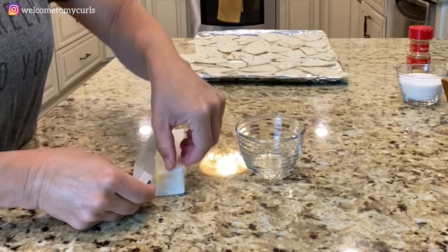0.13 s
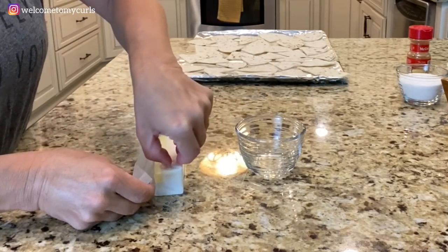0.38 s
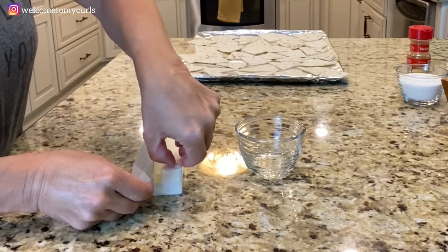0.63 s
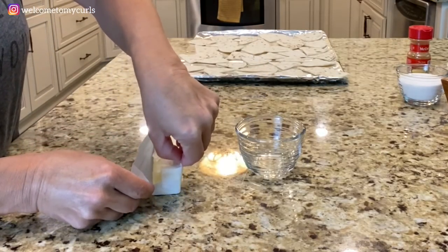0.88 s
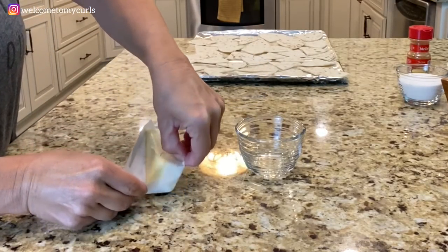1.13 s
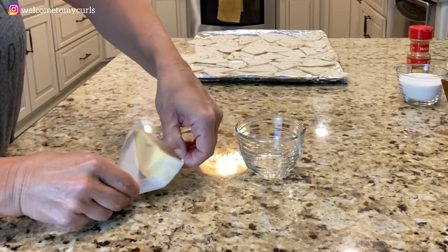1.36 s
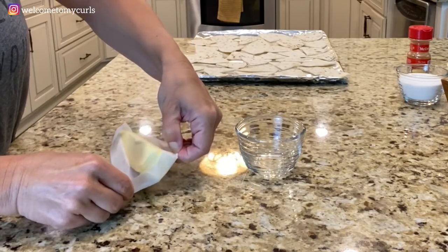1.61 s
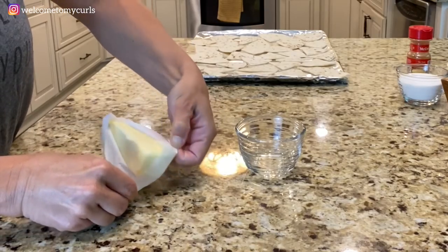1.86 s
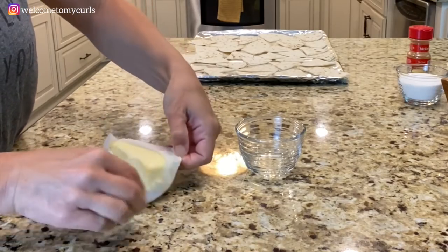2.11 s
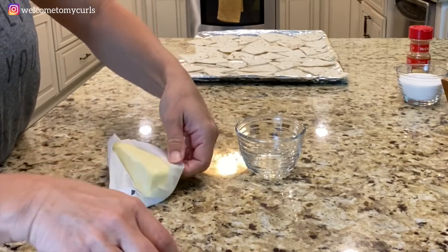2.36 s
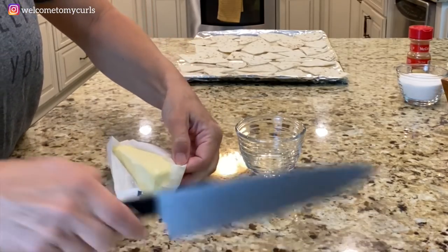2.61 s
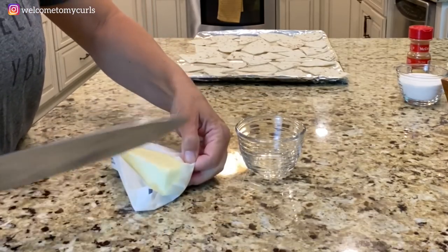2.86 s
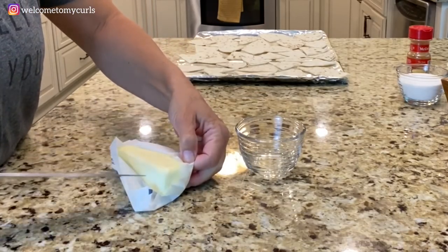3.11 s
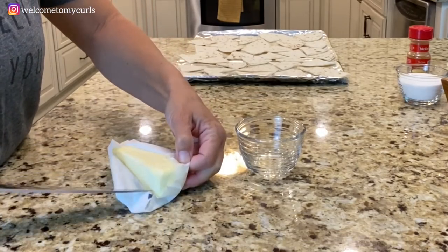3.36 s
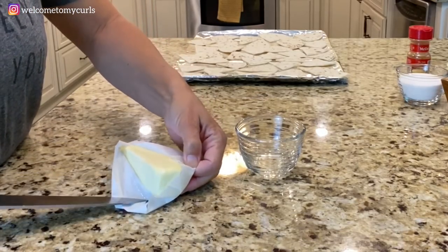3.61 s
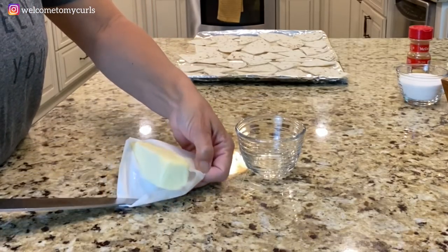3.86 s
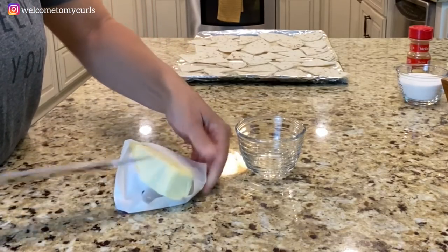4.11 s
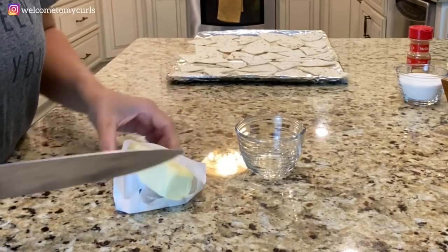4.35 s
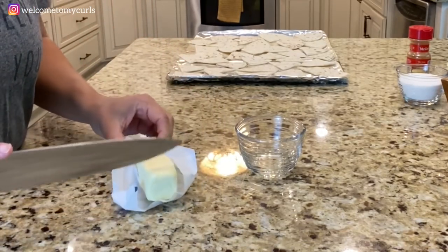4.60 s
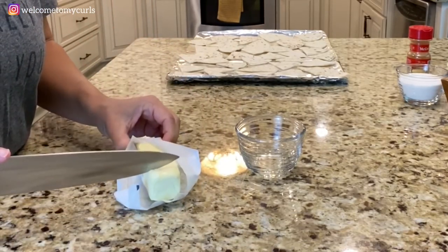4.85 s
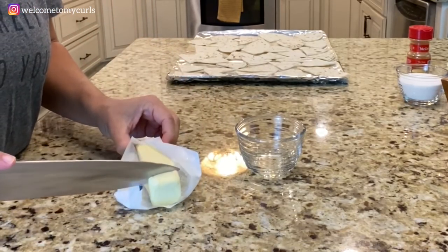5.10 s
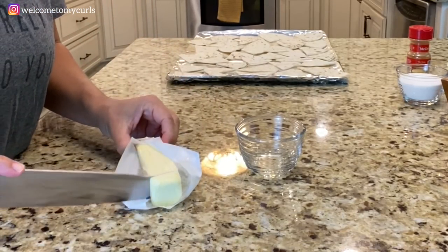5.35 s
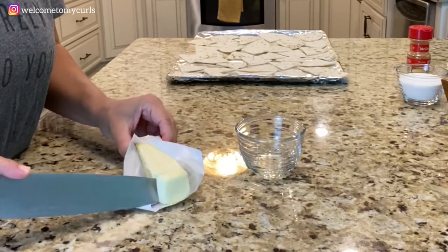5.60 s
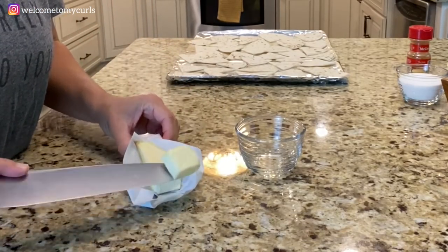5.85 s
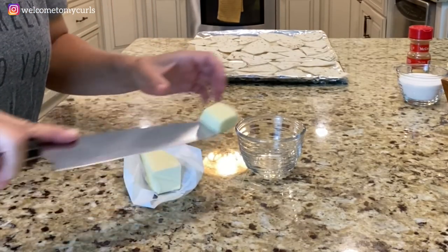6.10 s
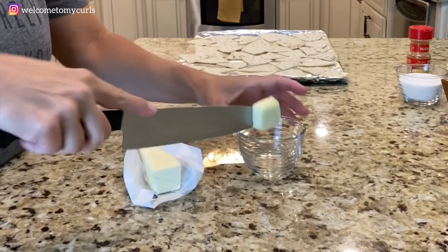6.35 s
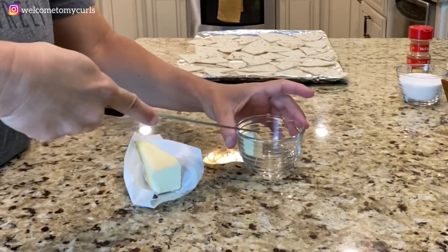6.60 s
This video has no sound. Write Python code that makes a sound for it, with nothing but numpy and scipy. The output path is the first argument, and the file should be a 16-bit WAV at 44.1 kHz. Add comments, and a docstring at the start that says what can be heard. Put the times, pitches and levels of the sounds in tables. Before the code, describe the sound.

A phone an arm's length away picks up a hard, reflective kitchen with faint air noise and low appliance hum. From 0 to 0.7 s waxed paper ticks quietly and fingertips hiss over it. Sharp, bright creases snap around 0.85 and 1.0 s, fewer follow, then a strong snap at 1.75 s. From 2.0 to 2.65 s comes a denser rustle with soft pats, low dull thumps and a tiny squeak near 2.5 s. A lull lasts until about 3.3 s, then crisp crinkling runs in bursts to 4.2 s. Lighter crackles and a thin scrape follow around 4.5 s, more snaps at 5.1 s. At 5.44 s the knife knocks the stone with a hard clack; paper rustles until 5.8 s. Near quiet, with tiny bouncing ticks at 6.4 s, then at 6.46 s a glass bowl clinks brightly and rattles on its foot, fading by about 6.6 s.

```python
"""Stone kitchen counter, an arm's length from a phone: waxed paper is peeled off a block of butter.
Creases snap as jolts through band-pass resonances; rubbing is ticks and hiss under swelling gains.
A knife drops through the butter onto the counter, then taps a small glass bowl that rings and rocks (decaying modes).
Pats, thumps, a squeak, a bouncing crumb and a scrape join in. The hard-walled kitchen answers by convolution
with an echo and decaying noise; appliance hum and air noise lie under it all."""
import sys
import numpy as np
from scipy import signal
from scipy.fft import rfft, irfft
from scipy.io import wavfile
from scipy.ndimage import uniform_filter1d

SR = 44100
rng = np.random.default_rng(int(sys.argv[2]) if len(sys.argv) > 2 else 0)


def put_to_file(sound):
    """Save the sound as 16-bit audio at rate SR, in the file named by the first command-line argument."""
    columns = np.atleast_2d(sound).T  # one column per channel
    safe = np.clip(columns, -1, 1)
    whole_steps = np.round(safe * 32767)
    wavfile.write(sys.argv[1], SR, whole_steps.astype(np.int16))


def invert_db(x):
    """Field ratio 10**(x/20) for x, a level in decibels (scalar or array-like)."""
    u = np.asarray(x, float) / 20
    return 10 ** u


N = 296372
T = np.arange(N) / SR


def colour(x, points):
    """Filter by a gain curve of (Hz, dB) points, interpolated over log frequency."""
    hz, db = np.transpose(points)
    f = np.fft.rfftfreq(x.shape[-1], 1 / SR) + 1
    gain_db = np.interp(np.log(f), np.log(hz), db)
    return irfft(rfft(x) * invert_db(gain_db), x.shape[-1])


def band(x, lo_hz, hi_hz):
    """Causal band-pass."""
    sos = signal.butter(2, [lo_hz, min(hi_hz, SR / 2.2)], "bandpass", fs=SR, output="sos")
    return signal.sosfilt(sos, x)


def band_rms(x, lo_hz, hi_hz):
    """Scale so that the band has rms 1."""
    return x / np.std(band(x, lo_hz, hi_hz))


def peak(x, db):
    """Scale to a peak level."""
    return x * invert_db(db) / np.max(np.abs(x))


def walk(rate_hz):
    """Slow random wander with spread 1."""
    k = int(SR / rate_hz)
    steps = np.repeat(rng.standard_normal(N // k + 1), k)
    w = uniform_filter1d(uniform_filter1d(steps, k), k)[:N]
    return w / np.std(w)


def bump(centre_s, length_s):
    """Bell-shaped gain; the length is two standard deviations."""
    return np.exp(-.5 * ((T - centre_s) / (length_s / 2)) ** 2)


def add(out, s, x):
    """Mix x into out at s seconds."""
    i = int(s * SR)
    out[i:i + len(x)] += x[:len(out) - i]


def jolts(count, settle_s=0.00594):
    """Sharp jolts, each an impulse with a flurry of uneven noise as the sheet settles."""
    t = T[:2500]
    noise, grain = rng.standard_normal((count, 2, 2500)).transpose(1, 0, 2)
    jolt = (t == 0) + .22 * noise * np.exp(-t / .0006)
    flurry = invert_db(-30 + 2.99 * grain) * noise * np.exp(-t / settle_s)
    return jolt + flurry


def thud(jolt, db, hz, span=1.422):
    """The dull, low part of a jolt, band-passed twice around hz."""
    low = band(jolt, hz / span, hz * span)
    return peak(band(low, hz / span ** 2, hz * span ** 2), db)


def snaps(panel_q=2.805, broad=0.436):
    """Creases flip over: each jolt rings panel and fold, thuds and spits at the edge."""
    # Each row: start in seconds, panel peak in dB, panel pitch in Hz, fold peak in dB, edge peak in dB.
    flips = [(0.0918, -48.5, 2260, -51, -67), (0.3023, -54.5, 3270, -55.5, -61.5),
             (.3821, -36, 3270, -47, -41), (0.4783, -49, 2590, -54.5, -47),
             (0.51, -48.5, 2530, -47.5, -55.5), (.5212, -48.5, 4250, -56, -37.5),
             (0.6678, -38.5, 3720, -48, -38), (.7315, -43.5, 6070, -61.5, -45),
             (0.8132, -36, 3110, -55, -30), (.842, -21.5, 3864, -30.5, -13),
             (0.9733, -23.5, 3670, -29, -23), (0.9828, -20.5, 5950, -36, -16),
             (0.9905, -15, 5926, -49.5, -10.5), (0.9952, -27, 3680, -35, -31),
             (1.1244, -28, 2950, -53, -20.5), (1.2375, -56.5, 2250, -48.5, -65),
             (1.3421, -43.5, 3910, -45.5, -49), (1.4376, -30, 4730, -49, -35.5),
             (1.534, -42.5, 2210, -51.5, -68), (1.654, -49.5, 3530, -48.5, -41),
             (1.6965, -33, 5270, -64.5, -33), (1.7056, -40, 6460, -64, -39),
             (1.7518, -14.5, 5460, -44.5, -13.5), (1.7638, -25.5, 6000, -53, -26),
             (1.767, -42, 5730, -33.5, -21.5), (1.785, -20, 4796, -56.5, -34.5),
             (1.9691, -35, 3820, -42.5, -42.5), (2.0141, -29.5, 4740, -44.5, -29),
             (2.044, -44.5, 3360, -46.5, -48.5), (2.091, -33, 5980, -52.5, -24),
             (2.1331, -26.5, 2690, -39, -28.5), (2.1491, -27.5, 5040, -46.5, -41),
             (2.1733, -17, 3440, -30.5, -16), (2.1888, -30, 3230, -51, -42.5),
             (2.245, -35.5, 4050, -50.5, -55.5), (2.2967, -50.5, 3140, -40.5, -45),
             (2.3044, -47, 2240, -44, -44.5), (2.3108, -40, 4610, -49.5, -26),
             (2.4233, -41.5, 2250, -43, -62.5), (2.4906, -31.5, 3950, -43.5, -19),
             (2.516, -46, 2230, -61.5, -41.5), (2.5276, -42, 2870, -64, -37),
             (2.6525, -30.5, 3350, -42.5, -23.5), (3.268, -39, 2227, -44, -61),
             (3.358, -23, 2780, -35, -18.5), (3.3934, -36, 3620, -36.5, -43),
             (3.4649, -38.5, 3530, -35.5, -37), (3.4766, -16, 4130, -22.5, -15),
             (3.4992, -23, 2930, -29, -35), (3.5197, -25, 3450, -30.5, -23.5),
             (3.573, -37, 2250, -52.5, -53.5), (3.6465, -23.5, 3370, -32, -56.5),
             (3.667, -30, 2800, -47.5, -35), (3.681, -53, 6300, -47, -18),
             (3.6868, -14.5, 4156, -27.5, -38.5), (3.715, -22, 4330, -36, -51.5),
             (3.8236, -36, 2190, -28, -61.5), (3.8578, -39.5, 2700, -38, -47.5),
             (3.8641, -32, 3840, -46.5, -29.5), (3.8853, -27.5, 5375, -45, -23.5),
             (3.8936, -20, 4320, -31, -15), (3.9118, -22.5, 4280, -30.5, -23.5),
             (3.9878, -20.5, 6030, -40.5, -17), (4.0141, -29.5, 3770, -28.5, -25.5),
             (4.0285, -24, 4450, -26.5, -18), (4.0505, -23, 3350, -46, -30),
             (4.0592, -32.5, 2270, -49.5, -25), (4.0873, -32, 2234, -37, -49),
             (4.106, -39.5, 3464, -50.5, -33), (4.431, -48.5, 3450, -69, -62),
             (4.5198, -28, 3090, -25, -54.5), (4.525, -21, 3310, -39, -32.5),
             (4.5278, -37, 2210, -30.5, -42.5), (4.5303, -25.5, 2630, -39, -22),
             (4.5614, -33, 5700, -51.5, -35.5), (4.7743, -50, 2580, -65, -61.5),
             (5.0588, -25, 4550, -46, -36.5), (5.0647, -34.5, 4900, -48, -29),
             (5.072, -25, 2068, -38.5, -24), (5.0841, -26, 3260, -42.5, -53.5),
             (5.164, -35, 4460, -51, -52), (5.2412, -31.5, 5760, -61.5, -28.5),
             (5.3772, -33.5, 3590, -42, -34), (5.4168, -36, 2540, -55.5, -52),
             (5.427, -19, 6230, -38.5, -19.5), (5.5126, -33, 2560, -46.5, -34),
             (5.541, -36.5, 2400, -46, -60), (5.888, -65.5, 6400, -72, -48),
             (5.909, -65.5, 6400, -71.5, -48.5), (5.7512, -25.5, 4780, -34, -48),
             (5.7679, -32, 2940, -41, -32.5), (6.309, -71, 4670, -71.5, -46)]
    thud_hz, thud_over_fold_db = 708.5, -14
    out = np.zeros(N)
    for (s, panel_db, hz, fold_db, edge_db), jolt in zip(flips, jolts(count=len(flips))):
        half_hz = hz / panel_q / 2
        pitched = peak(band(jolt, hz - half_hz, hz + half_hz), 0)
        panel = pitched + broad * peak(band(jolt, 2790, 4910), 0)
        fold = band(band(jolt, 1366, 1960), 850, 2770)
        edge = band(band(jolt, 6800, 15000), 5500, 16000)
        add(out, s, peak(panel, panel_db) + peak(fold, fold_db) + peak(edge, edge_db))
        add(out, s, thud(jolt, fold_db + thud_over_fold_db, thud_hz))
    return out


def pats():
    """The wrapped block pats the counter or the fingers: the dull part of a jolt alone."""
    # Each row: start in seconds, peak in dB, pitch in Hz.
    soft_hits = [(0.091, -48.5, 652), (0.301, -44.5, 1194), (0.38, -49, 751), (0.665, -44.5, 1190),
                 (0.84, -32, 826), (0.989, -38, 802), (1.122, -33, 761), (1.226, -40.5, 1090),
                 (1.341, -50.5, 541), (1.436, -43.5, 779), (1.749, -40, 1160), (2.014, -38, 735),
                 (2.043, -41, 778), (2.133, -34, 1095), (2.171, -34, 822), (2.244, -38.5, 1034),
                 (2.303, -41.5, 900), (2.515, -49.5, 961), (2.651, -35, 1095), (3.268, -48.5, 397),
                 (3.357, -42.5, 875), (3.465, -35, 1002), (3.518, -38, 419), (3.987, -39, 703),
                 (3.997, -37, 767), (4.012, -32.5, 773), (4.027, -26.5, 474), (4.105, -41.5, 662),
                 (4.157, -44, 604), (4.176, -44, 999), (5.092, -49.5, 514), (5.164, -47.5, 509),
                 (5.238, -44.5, 593), (5.511, -29, 717), (5.672, -47.5, 575)]
    out = np.zeros(N)
    for (s, db, hz), jolt in zip(soft_hits, jolts(count=len(soft_hits))):
        add(out, s, thud(jolt, db, hz))
    return out


def swells(peak_s, db, rise_s, fade_s):
    """Gain of gestures that build to a peak and fade, both evenly in dB; their powers add."""
    power = 0
    for p, d, fade in zip(peak_s, db, fade_s):
        steps = np.maximum((p - T) / rise_s, (T - p) / max(fade, .01))
        power = power + invert_db(d - 20 * steps) ** 2
    return np.sqrt(power)


def rubbing(hiss=0.595):
    """Paper crackles as a swarm of tiny unequal ticks; skin on wax hisses high and smooth."""
    # Tugs at the sheet. Each row: peak time in seconds, flexing level in dB, crackle level in dB,
    # fade in seconds per 20 dB (under 0.01 acts as 0.01).
    tugs = [(.006, -73, -69, 0.4557), (.513, -73, -70, 0.1247), (.7, -65, -61, -0.07),
            (.77, -70, -59, 0.04), (.849, -65, -63.5, 0.1869), (.989, -56, -56, 0.2159),
            (1.134, -77, -63, 0.3944), (1.535, -69, -67, 0.21), (1.761, -85, -53.5, 0.1772),
            (1.98, -57, -59.5, -0.02), (2.045, -65.5, -59, 0.11), (2.082, -57, -63, -0.0149),
            (2.143, -55, -48.5, 0.111), (2.196, -51, -68.5, 0.0656), (2.251, -57.5, -69, 0.0882),
            (2.301, -69.5, -54.5, 0.0638), (2.383, -64.5, -65, 0.3456), (2.523, -63.5, -48, 0.0326),
            (2.595, -73.5, -70, 0.49), (3.355, -52.5, -47.5, 0.1848), (3.413, -53, -68.5, -0.0956),
            (3.471, -46.5, -52, 0.0394), (3.688, -58, -53.5, 0.0523), (3.87, -56, -66, 0.1622),
            (3.992, -55.5, -52, 0.0725), (4.099, -58, -47, -0.0259), (4.177, -59.5, -63, -0.0618),
            (4.262, -87, -66.5, 0.0827), (4.394, -95, -67, 0.155), (4.489, -63.5, -64.5, 0.25),
            (5.072, -62, -55, 0.28), (5.441, -51.5, -75, 0.075), (5.602, -53, -54, 0.0955),
            (5.668, -49.5, -44, 0.08), (5.749, -52, -48, 0.0005)]
    # Fingertips sliding on the wax. Each row: peak time in seconds, level in dB, fade as above.
    slides = [(0.255, -58.5, .09), (.513, -63, 0.13), (0.764, -41.5, -0.17), (.849, -63.5, 0.24),
              (.989, -66.5, 0.27), (1.76, -57.5, 0.19), (1.98, -52, 0.06), (2.039, -53.5, -0.127),
              (2.141, -51, 0.1156), (2.301, -62.5, 0.5255), (2.529, -51, 0.1526), (3.371, -62, 0.33),
              (3.467, -60, 0.2), (3.992, -65.5, 0.53), (4.149, -58, -0.07), (4.262, -55, -0.0249),
              (4.394, -66.5, 0.51), (4.471, -64, 0.21), (5.07, -69.5, -0.11), (5.441, -62, 0.26),
              (5.668, -42.5, 0.0678)]
    # Spectrum of the flexing sheet. Each row: frequency in Hz, relative gain in dB.
    sheet_curve = [(250, -17), (500, -10.5), (800, -10), (1500, -3), (2200, -1.5), (4000, -14.5)]
    # Spectrum of the paper's crackle. Each row: frequency in Hz, relative gain in dB.
    paper_curve = [(1200, -20), (2200, -12.5), (3200, -5), (5500, -5), (8000, -16), (16000, -28.5)]
    # Spectrum of skin on wax. Each row: frequency in Hz, relative gain in dB.
    skin_curve = [(3500, -21), (6000, -10), (8600, -1.5), (10300, -6), (13300, 2.5), (16000, -5)]
    tug_rise_s, slide_rise_s = 0.0485, 0.0535  # per 20 dB
    ticks_per_s = 3000

    tug_s, sheet_db, paper_db, tug_fade_s = np.transpose(tugs)
    slide_s, skin_db, slide_fade_s = np.transpose(slides)
    hit = rng.random(N) < ticks_per_s / SR
    size_db = np.minimum(3.2 * rng.exponential(size=N), 10)
    ticks = hit * invert_db(size_db) * rng.standard_normal(N)
    ticks = ticks / np.std(ticks) + hiss * rng.standard_normal(N)

    sheet = band_rms(colour(ticks, sheet_curve), 500, 2200) * invert_db(2.87 * walk(50))
    paper = band_rms(colour(ticks, paper_curve), 2200, 6500) * invert_db(2.43 * walk(70))
    rough = rng.standard_normal(N) + .4 * ticks
    skin = band_rms(colour(rough, skin_curve), 7000, 15000) * invert_db(1.2 * walk(83))

    flexing = sheet * swells(tug_s, sheet_db, tug_rise_s, tug_fade_s)
    crackle = paper * swells(tug_s, paper_db, tug_rise_s, tug_fade_s)
    sliding = skin * swells(slide_s, skin_db, slide_rise_s, slide_fade_s)
    return flexing + crackle + sliding


def ring(modes, chance, detune):
    """Sum of decaying sines; one blow's share and tuning of every mode differ a little."""
    t = T[:SR // 2]
    out = np.zeros(len(t))
    for (hz, db, t60_s), c in zip(modes, chance):
        decay = np.exp(-np.log(1000) * t / t60_s)
        out += invert_db(db + 0.61 * c) * decay * np.sin(2 * np.pi * hz * (1 + detune * c) * t)
    return out


def blows():
    """Counter, bowl foot and glass wall ring; a hard contact cracks, and loose things clatter after it."""
    # Knife blows and the bowl rocking on its foot. Each row: start in seconds, then peaks in dB of
    # counter, bowl foot, glass wall and crack.
    contacts = [(5.4408, -28, -60.5, -90, -16.5), (5.4438, -21, -45, -90, -29),
                (6.4575, -26, -17, -15.5, -17), (6.4705, -26.5, -12, -23.5, -47),
                (6.4783, -31.5, -16, -18.5, -44.5), (6.4917, -35.5, -17, -20, -48.5),
                (6.5418, -39.5, -26, -32.5, -57.5), (6.5530, -45.5, -25, -41.5, -57.5),
                (6.5650, -51, -33.5, -45, -44.5), (6.5899, -46.5, -22, -42.5, -54.5)]
    # Modes of the stone counter. Each row: frequency in Hz, relative level in dB, t60 in seconds.
    counter_modes = [(143.6, -25.5, 0.123), (253.9, -7, 0.219), (387, -35, 0.185), (430, -32, 0.11),
                     (575.6, 0, 0.134), (757, -14, 0.1), (772.8, -1, 0.27), (815.3, 3.5, 0.155),
                     (952, -13, 0.075), (1075, -1.5, 0.15), (1729, 0.5, 0.071)]
    # Modes of the bowl's foot on stone. Each row: frequency in Hz, relative level in dB, t60 in seconds.
    foot_modes = [(1127, 6, 0.064), (1258.7, 7.5, 0.0474), (1400, 6.5, 0.0396), (1420, -11, 0.063),
                  (2296, -8.5, 0.09), (2654, -1.5, 0.046), (3123, -8, 0.054), (3530, -23, 0.053)]
    # Modes of the glass wall. Each row: frequency in Hz, relative level in dB, t60 in seconds.
    glass_modes = [(1948, -3, .13), (1966, -11, .12), (2024, -12, .15), (3332, -20, .1), (4296, 0, .19),
                   (7540, -19, .25), (7572, -20, .2), (9950, -20, .09), (11710, -17, .12), (14600, -22, .1)]
    skid_s, crack_s, fizz_s, clatter_s = 0.0024, 0.00145, 0.022, 0.01556  # decay time constants
    fizz_over_crack_db = -22

    out, t = np.zeros(N), T[:4000]
    chance = rng.standard_normal((len(contacts), 4, 4000))
    for (s, counter_db, foot_db, glass_db, crack_db), (c, skid, snap, loose) in zip(contacts, chance):
        counter = band(band(ring(counter_modes, c[:30], detune=.01), 130, 6000), 130, 6000)
        add(out, s, peak(counter, counter_db))

        scuff = skid * np.exp(-t / skid_s)  # the foot skids a little on the stone
        foot = signal.fftconvolve(ring(foot_modes, c[30:60], detune=0.0356), scuff)
        add(out, s, peak(band(foot, 620, 6100), foot_db))

        push_s = np.clip(1.5e-6 * invert_db(-crack_db), 1e-5, 2e-4)  # faint crack, soft contact, dull ring
        glass = signal.fftconvolve(ring(glass_modes, c[60:90], detune=0), np.exp(-t / push_s))
        add(out, s, peak(glass, glass_db))

        crack = band(snap * np.exp(-t / crack_s), 4000, 14470)
        add(out, s, peak(crack, crack_db))
        fizz = band(c * np.exp(-t / fizz_s), 5000, 14800)  # stands for countless high modes
        add(out, s, peak(fizz, crack_db + fizz_over_crack_db))
        clatter = band(loose * np.exp(-t / clatter_s), 435, 3150)
        add(out, s, peak(clatter, max(counter_db, foot_db - 13.5)))
    return out


def thumps():
    """Something soft set down on the counter: bell-shaped swells of low noise."""
    # Each row: centre in seconds, rms at the centre in dB, length in seconds.
    set_downs = [(2.055, -57.5, 0.095), (2.182, -57.5, 0.12)]
    out = np.zeros(N)
    for s, db, length_s in set_downs:
        low = band_rms(band(rng.standard_normal(N), 50, 170), 50, 170)
        out += invert_db(db) * bump(s, length_s) * low
    return out


def squeak():
    """A fingertip sticks and slips on the wax: a short, shaky stack of harmonics."""
    # Mean level in dB of each harmonic, from the fundamental up, relative to the squeak.
    harmonics_db = [-10, 0, -2, -11, -13]
    centre_s, length_s, hz, db = 2.521, .02, 945, -46
    phase = 2 * np.pi * np.cumsum(hz * (1 + .03 * walk(150))) / SR
    stack = sum(invert_db(h_db + 3.5 * walk(180)) * np.sin(k * phase) for k, h_db in enumerate(harmonics_db, 1))
    return invert_db(db) * stack * bump(centre_s, length_s)


def bounce(count=5):
    """A crumb of something hard bounces: filtered impulses, ever closer and each 1 dB softer."""
    first_s, gap_s, gap_ratio, db, hz = 6.41, .0135, .76, -57, 5600
    impulse = 1. * (T[:400] == 0)
    tick = band(impulse, hz / 1.15, hz * 1.15)
    out = np.zeros(N)
    for k in range(count):
        s = first_s + gap_s * (1 - gap_ratio ** k) / (1 - gap_ratio)
        add(out, s, peak(tick, db - k))
    return out


def scrape():
    """The wrapper's edge scrapes thinly on the stone: a swell of narrow-band noise."""
    centre_s, length_s, hz, db = 4.5, 0.1852, 5600, -66
    hiss = band(rng.standard_normal(N), hz / 1.05, hz * 1.05)
    return invert_db(db) * hiss / np.std(hiss) * bump(centre_s, length_s)


def kitchen(x):
    """Scatter off things on the counter, an echo off the cupboards, then a dense tail that dies first in the treble."""
    # Decay of the room. Each row: frequency in Hz, t60 in seconds.
    decay_curve = [(300, 0.654), (1300, 0.675), (3500, 0.4775), (9000, 0.477), (15000, 0.185)]
    tail_db, near_db, near_s = -10.5, -10.5, 0.00136
    echo_s, echo_db = .0059, -16
    t = T[:int(.7 * SR)]
    hz, t60_s = np.transpose(decay_curve)
    tail = np.zeros(len(t))
    for f in 125 * 2. ** np.arange(8):
        octave = band(rng.standard_normal(len(t)), f / 2 ** .5, f * 2 ** .5)
        tail += octave * np.exp(-np.log(1000) * t / np.interp(np.log(f), np.log(hz), t60_s))
    tail = tail * (1 - np.exp(-t / 0.00217))
    near = rng.standard_normal(len(t)) * t * np.exp(-t / near_s)
    # each part is scaled by its total energy
    reply = sum(part * invert_db(db) / np.sqrt(np.sum(part ** 2)) for part, db in ((tail, tail_db), (near, near_db)))
    reply[int(echo_s * SR)] += invert_db(echo_db)
    return x + signal.fftconvolve(x, reply)[:N]


def background():
    """Air noise with a slow swell, and wavering appliance tones."""
    # Spectrum of the air noise. Each row: frequency in Hz, relative gain in dB.
    air_curve = [(8.8, -17.5), (15, 4.5), (30, -16), (40, -14), (58, -11), (72, -20), (81, -18.5),
                 (169, -23.5), (269, -26), (303, -26.5), (559, -32.5), (793, -34), (865, -36), (1960, -40),
                 (2140, -42.5), (6480, -48), (16000, -50)]
    # Appliance tones. Each row: mean frequency in Hz, mean level in dB rms, wander in Hz.
    tones = [(58.5, -63, 1.5), (294, -75.5, 1), (6654, -86, 60)]
    air_db = -64 + .5 * walk(2.247)
    out = band_rms(colour(rng.standard_normal(N), air_curve), 95.7, 16000) * invert_db(air_db)
    for hz, db, wander_hz in tones:
        phase = 2 * np.pi * np.cumsum(hz + wander_hz * walk(10)) / SR
        out += 2 ** .5 * invert_db(db + 1.5 * walk(8)) * np.sin(phase)
    return out


def scene():
    """Hands and knife sound through the kitchen; the background lies under them."""
    paper = snaps() + pats() + rubbing() + squeak() + scrape()
    hits = blows() + thumps() + bounce()
    return (kitchen(paper + hits) + background())[None]


def band_limit(x):
    """A steep low-pass at the top of the band."""
    return signal.sosfilt(signal.butter(12, 16810, fs=SR, output="sos"), x)


def record(dry):
    """The microphone peaks in the treble and falls off above."""
    # Microphone response. Each row: frequency in Hz, gain in dB.
    mic_curve = [(100, 0), (6000, 0), (8600, 2), (10200, -5), (13500, -5), (15800, -8), (16300, -14),
                 (16800, -70)]
    mix = colour(dry, mic_curve)
    return band_limit(mix)


dry = scene()
out = record(dry)
put_to_file(out)
```